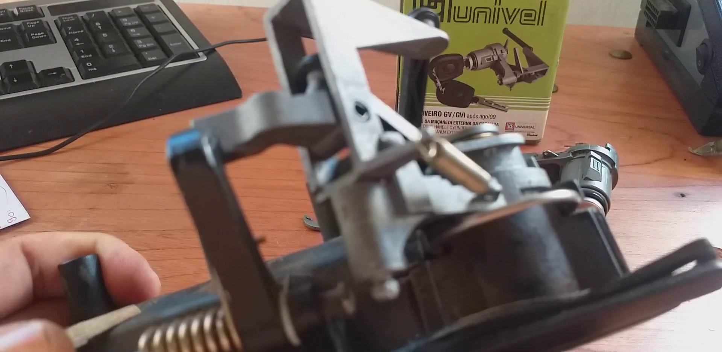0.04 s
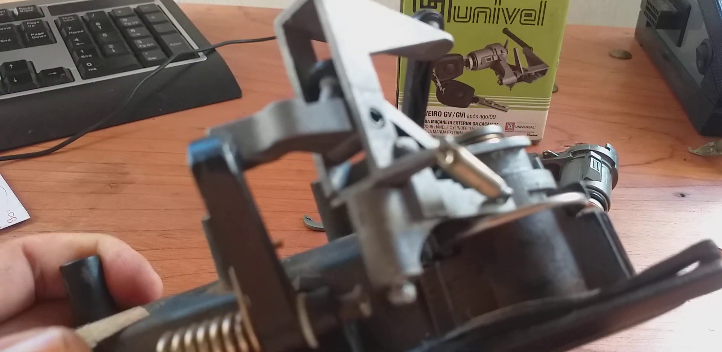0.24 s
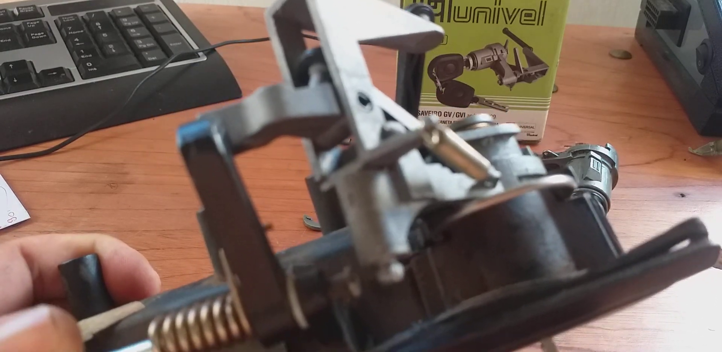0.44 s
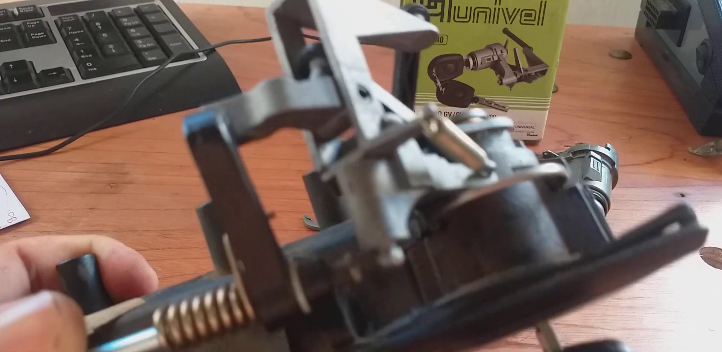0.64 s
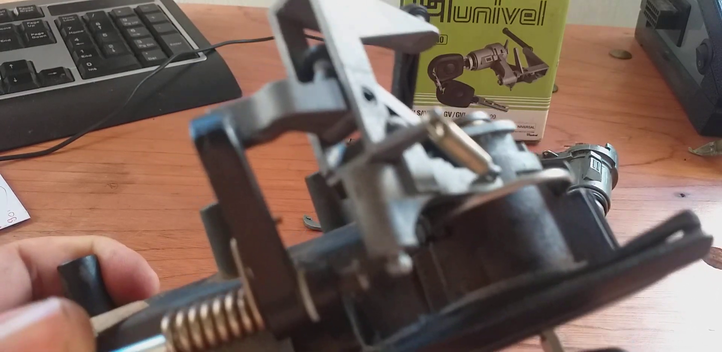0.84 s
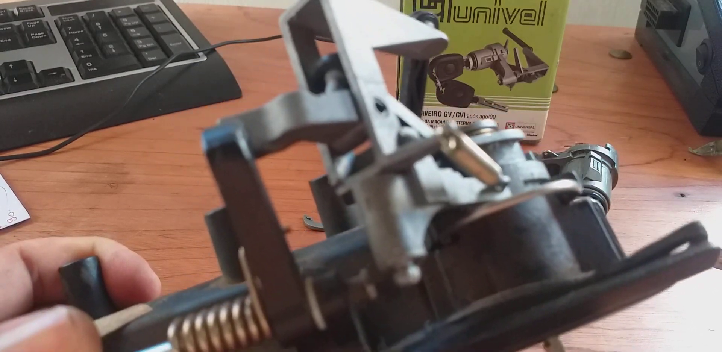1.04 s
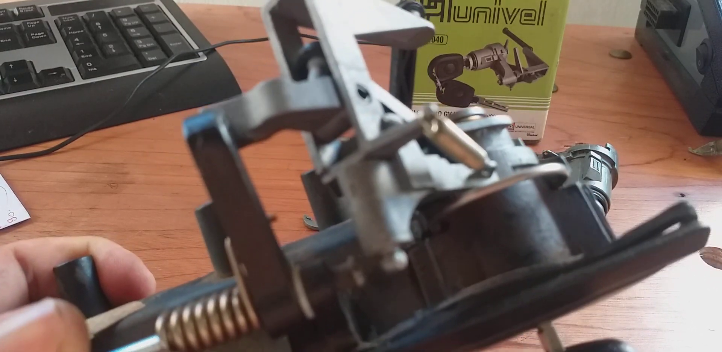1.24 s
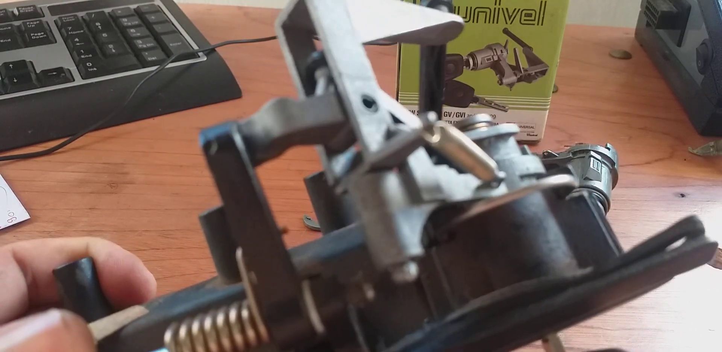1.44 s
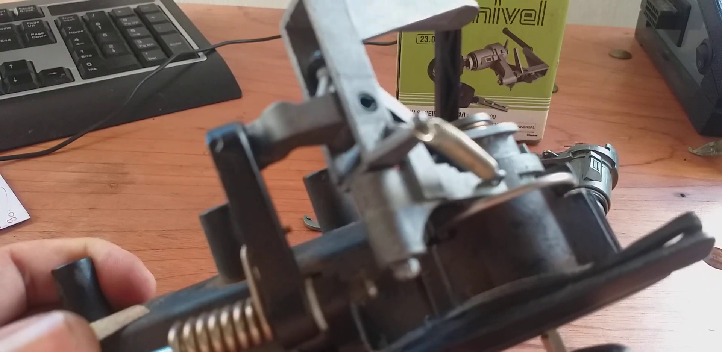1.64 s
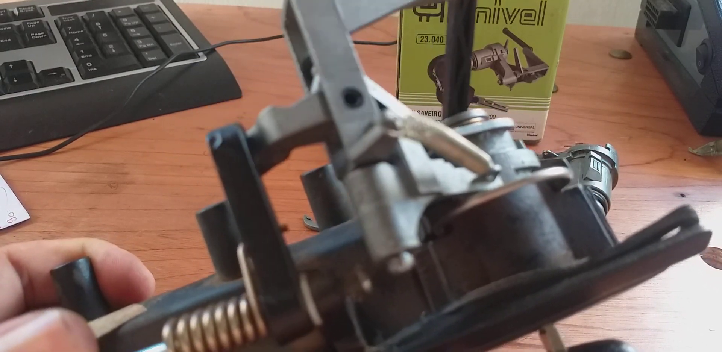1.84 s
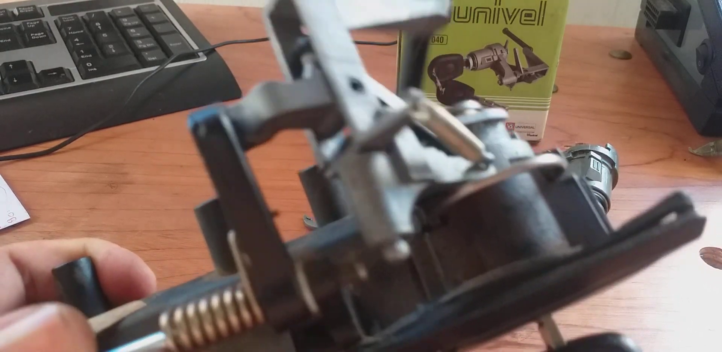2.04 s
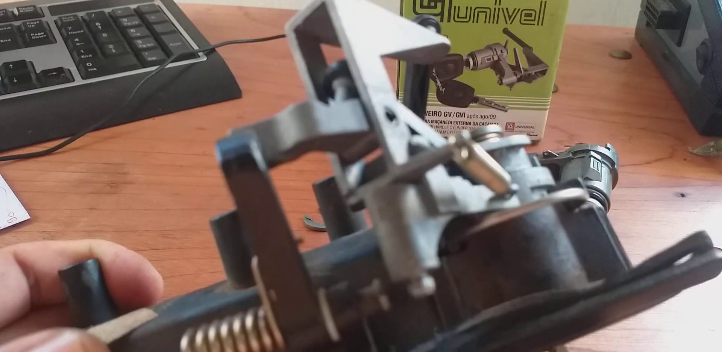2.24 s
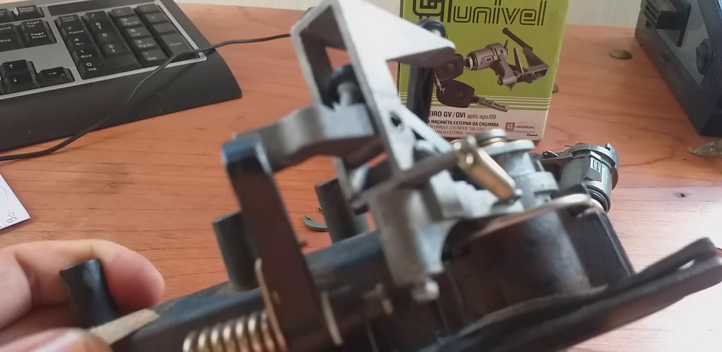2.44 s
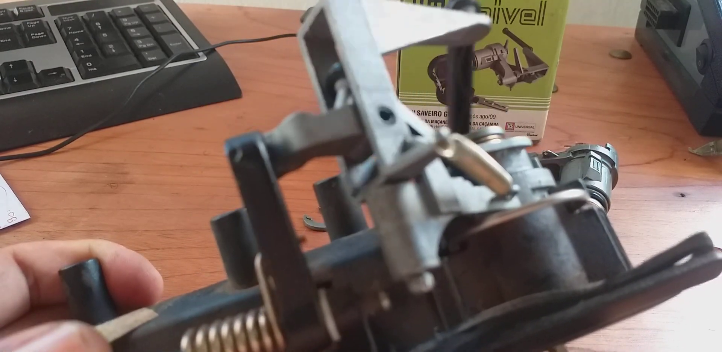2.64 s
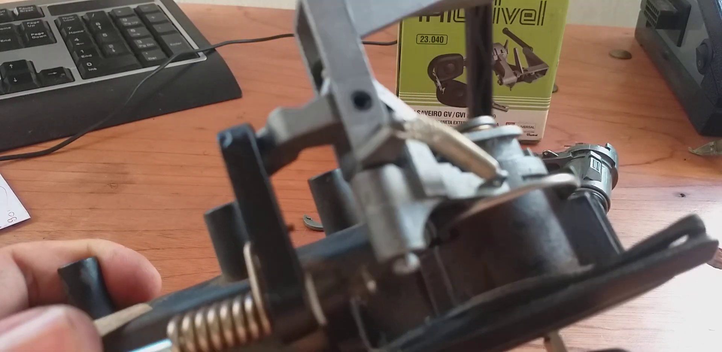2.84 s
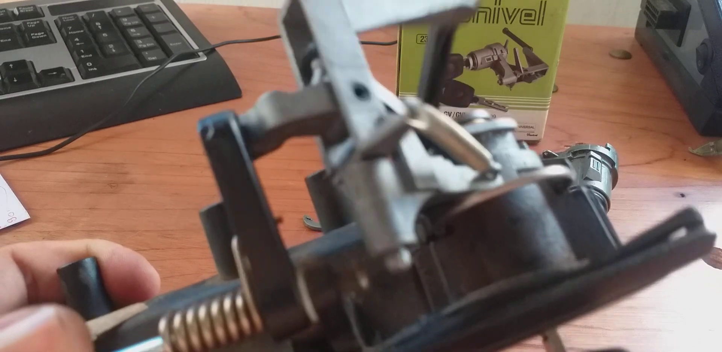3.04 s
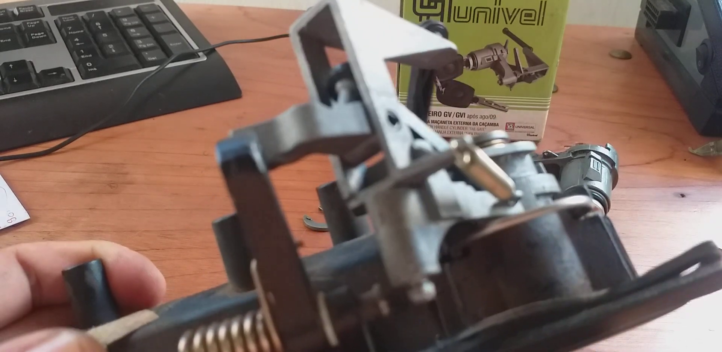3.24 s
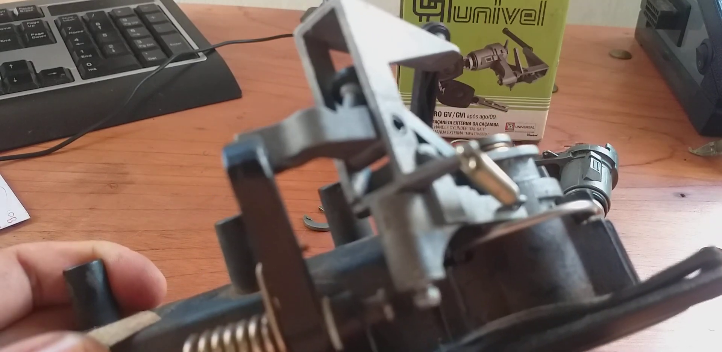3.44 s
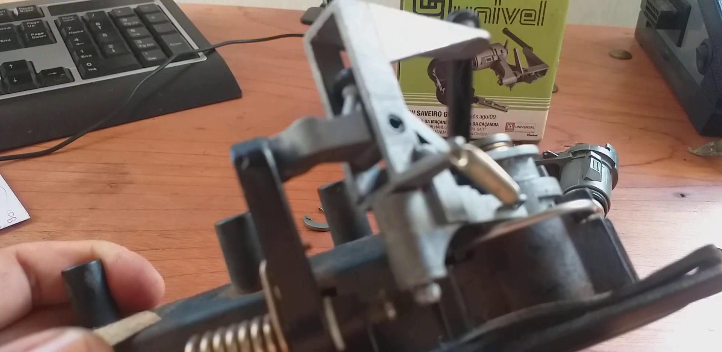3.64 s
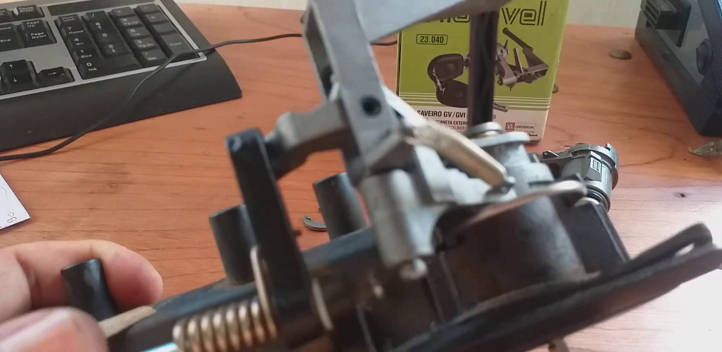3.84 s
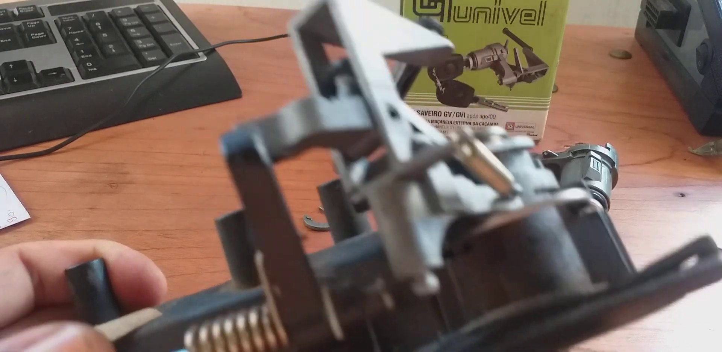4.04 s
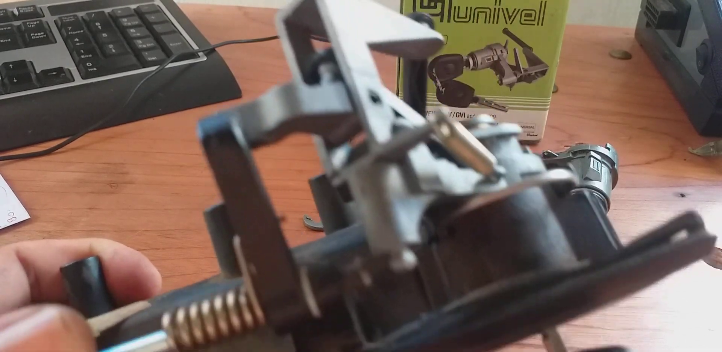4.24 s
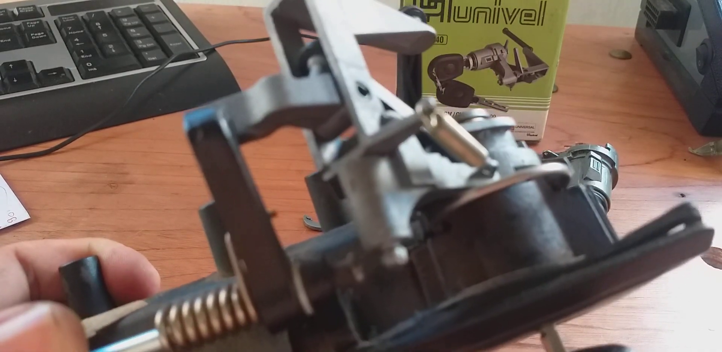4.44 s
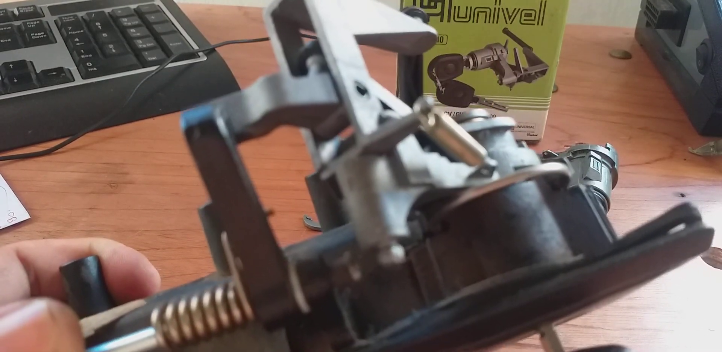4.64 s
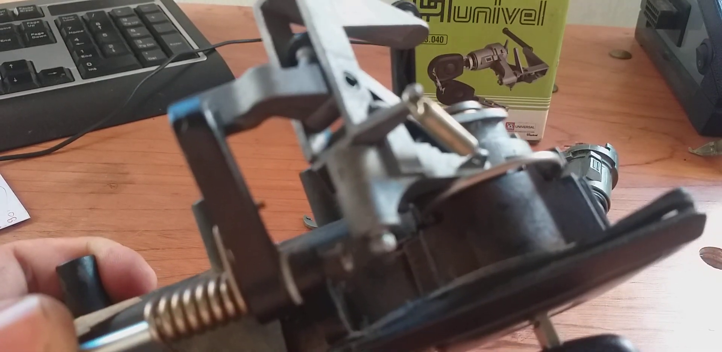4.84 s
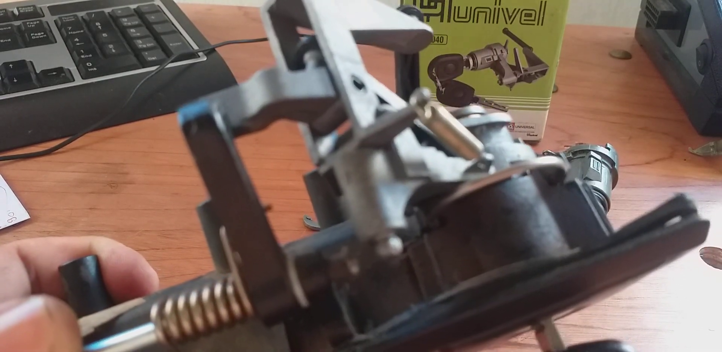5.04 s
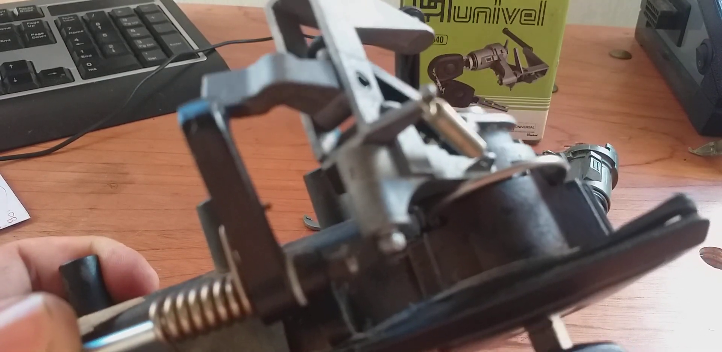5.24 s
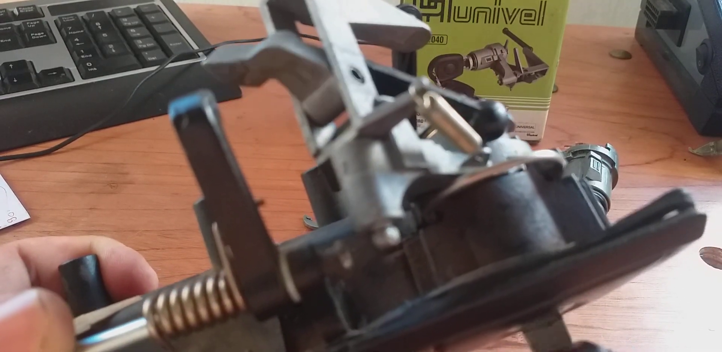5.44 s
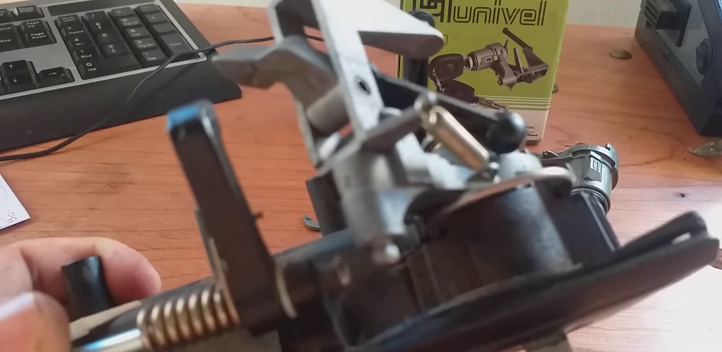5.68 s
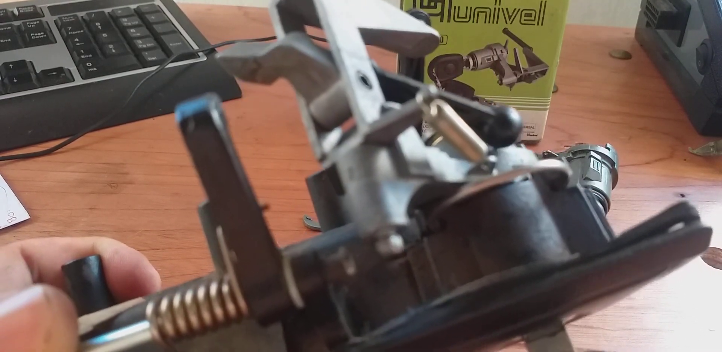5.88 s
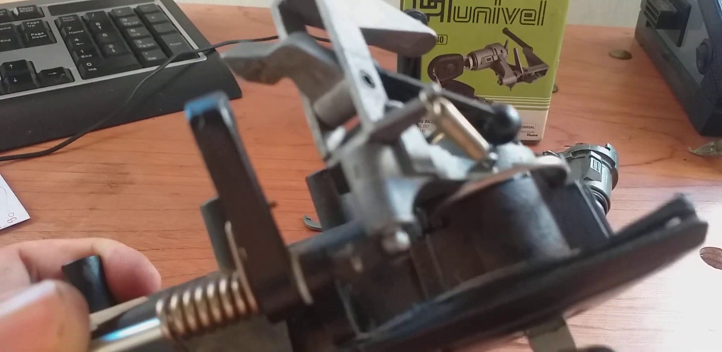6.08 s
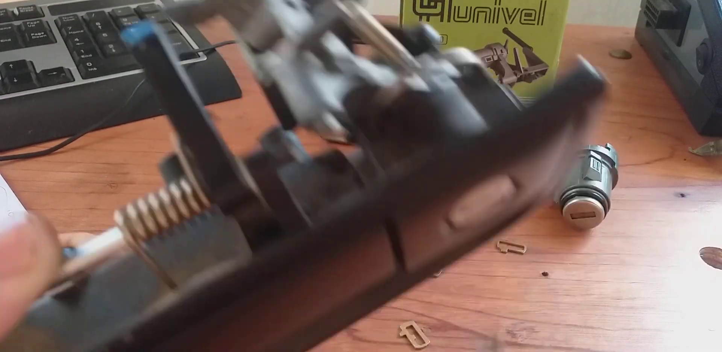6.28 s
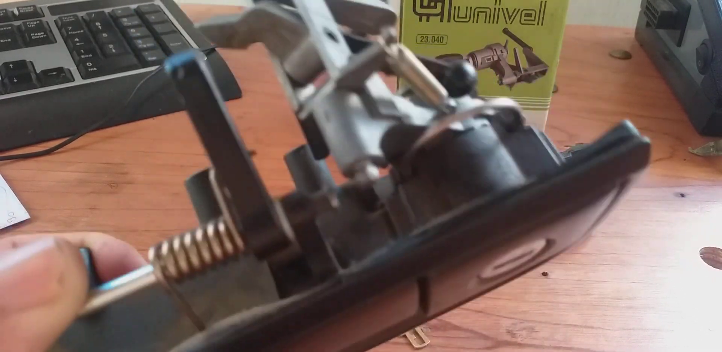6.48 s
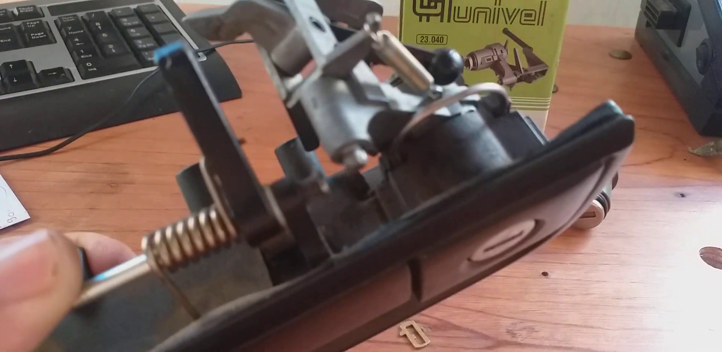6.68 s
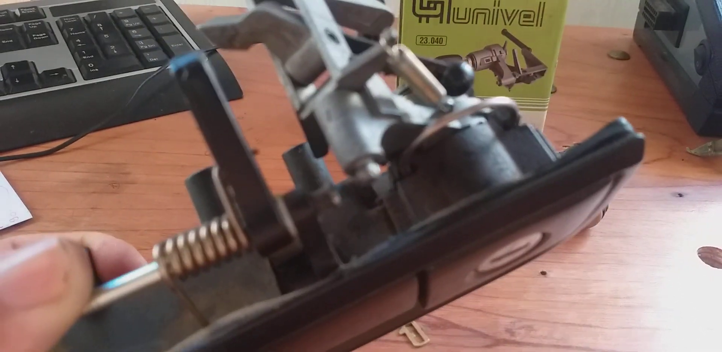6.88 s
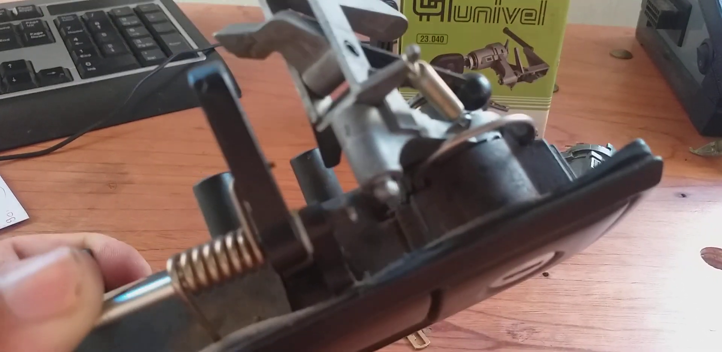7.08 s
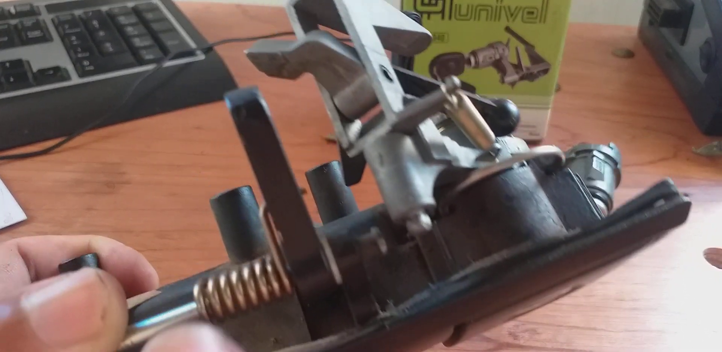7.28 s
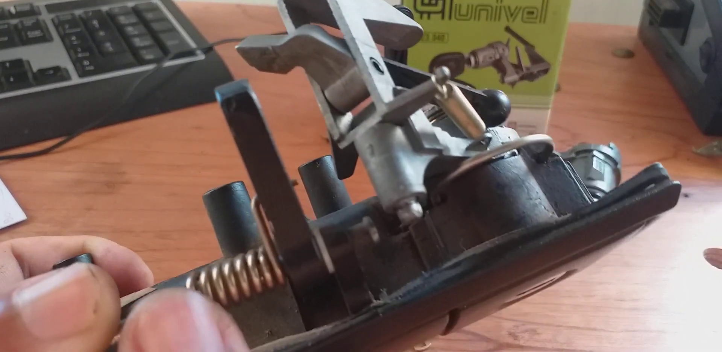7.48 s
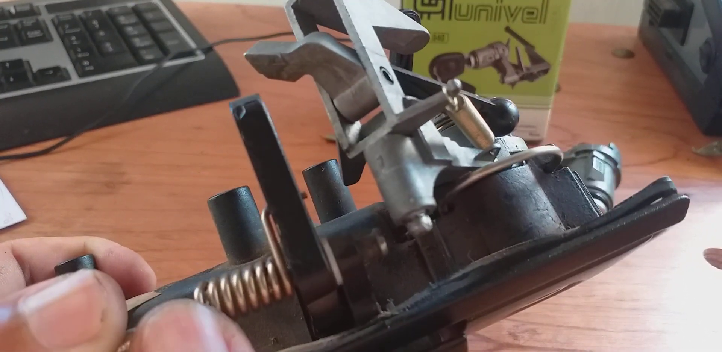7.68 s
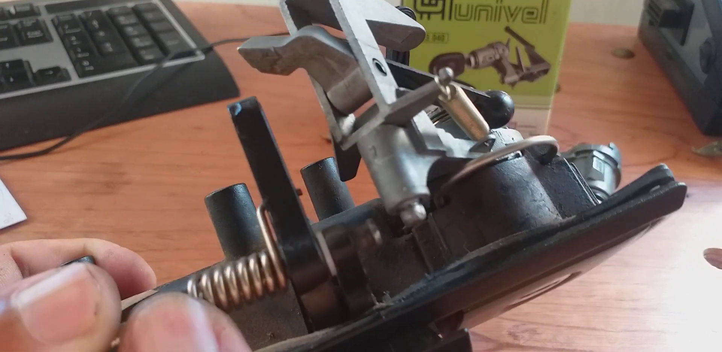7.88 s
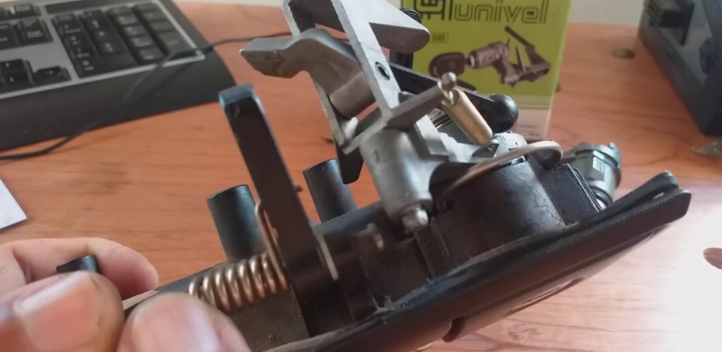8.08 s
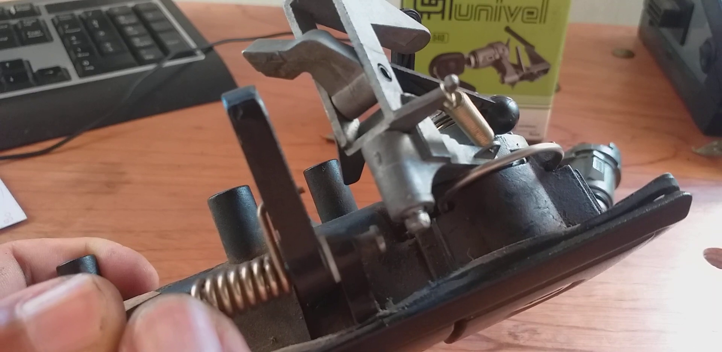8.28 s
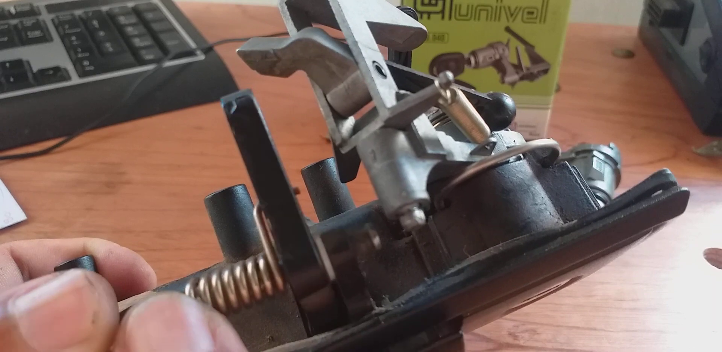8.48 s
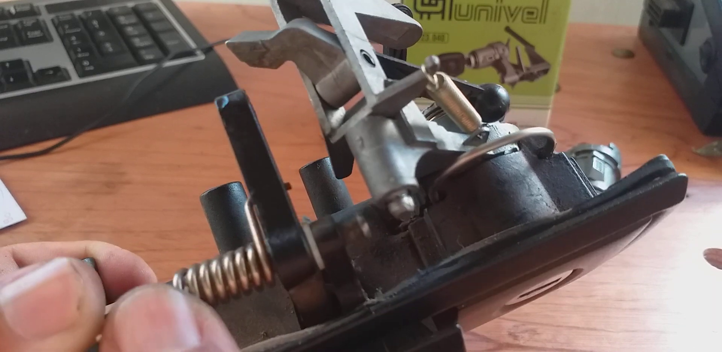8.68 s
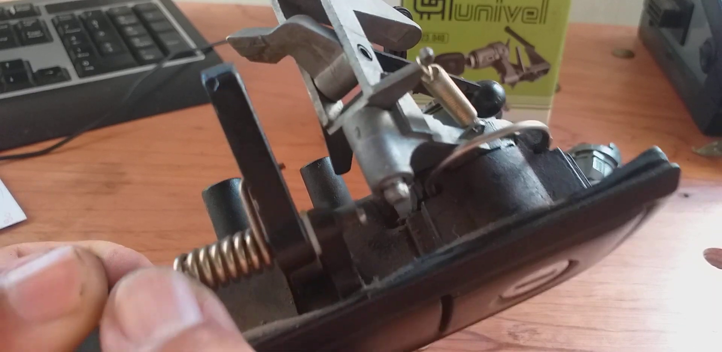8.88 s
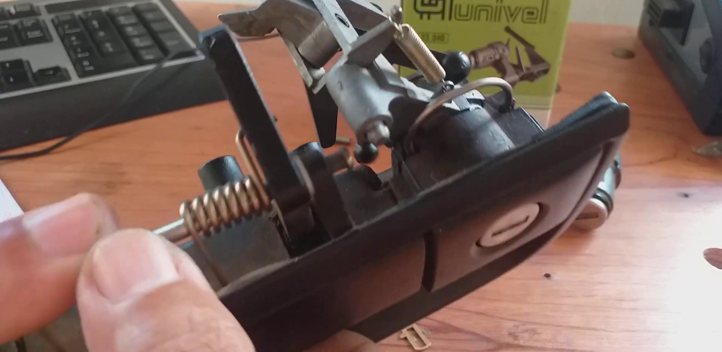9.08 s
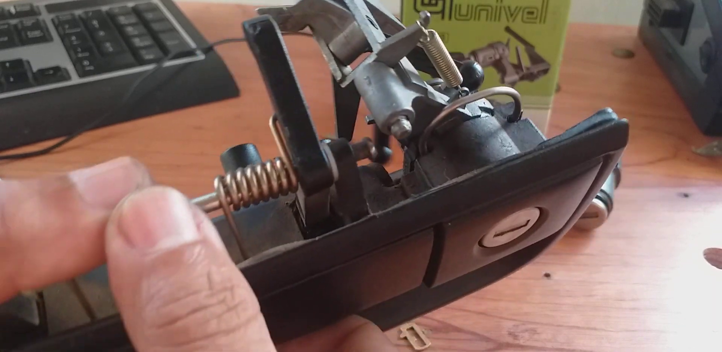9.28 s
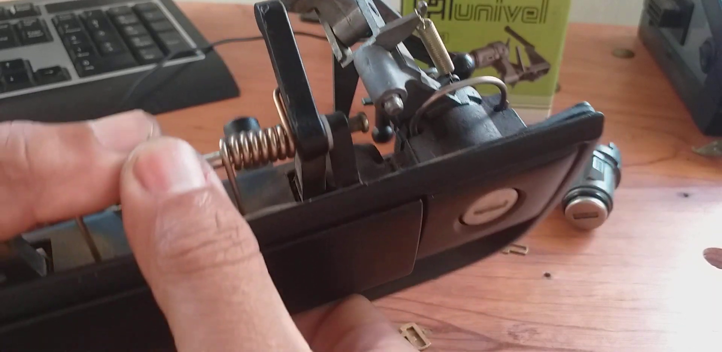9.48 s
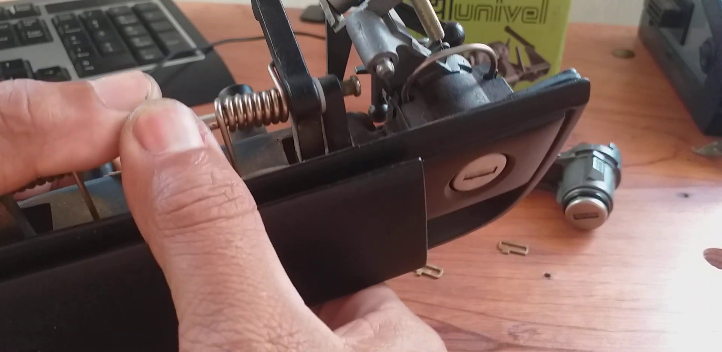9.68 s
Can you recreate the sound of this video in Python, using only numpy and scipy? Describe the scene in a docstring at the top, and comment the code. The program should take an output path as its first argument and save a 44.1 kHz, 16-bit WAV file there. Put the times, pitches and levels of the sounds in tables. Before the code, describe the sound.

A metal lock handle is worked by hand, close to the microphone in a small workshop. Its steel levers click and scrape lightly at uneven intervals, with soft, dull knocks from the housing. About six seconds in, a dry pivot gives a brief, loud, very high squeak with a sharp click. The sprung handle snaps back and rattles, then only a few faint ticks follow. A distant engine drones faintly and fades.

```python
"""Tailgate handle on a workshop desk

A tailgate lock handle is worked by hand, close up. Its steel levers click and rub, its housing knocks,
a dry pivot sticks and slips in a very high squeak, then the sprung handle snaps back and rattles.
A far engine drones and fades. The loudest squeak ducks the limiter for about two seconds."""
import sys
import numpy as np
from scipy import signal
from scipy.fft import rfft, irfft, next_fast_len
from scipy.io import wavfile
from scipy.ndimage import uniform_filter1d, map_coordinates

SR = 44100
rng = np.random.default_rng(int(sys.argv[2]) if len(sys.argv) > 2 else 0)


def inscribe(sig):
    """Save sig as 16-bit PCM at rate SR to the path in sys.argv[1].

    A 1-D sig is mono; a 2-D sig holds one channel per row.
    Samples are clipped to [-1, 1] before scaling.
    """
    pcm = np.round(np.clip(np.atleast_2d(sig).T, -1, 1) * 32767)
    wavfile.write(sys.argv[1], SR, pcm.astype(np.int16))


N = 428652

# decay of the small workshop: f/Hz, t60/s
ROOM_DECAY = [(150, .4), (500, .38), (1500, .34), (4000, .315), (8000, .29), (13000, .28)]
# tone of its reverb: f/Hz, level/dB
ROOM_EQ = [(150, -4), (600, -3), (2500, -3.5), (5000, -5.5), (8000, -6.3), (13000, -6)]
# spectrum of the room tone: f/Hz, relative level/dB
HISS_SPECTRUM = [(25, 0), (40, 10), (62, 26), (110, 26), (200, 13), (350, 9), (600, 8), (1000, 4),
                 (2000, 1), (5000, -1), (9500, -4), (13000, -.5), (16000, 0)]
# spectrum of the engine's rumble: f/Hz, relative level/dB
RUMBLE_SPECTRUM = [(25, -42), (60, -18), (115, -3), (170, -3), (220, -6), (320, -6), (400, -12), (500, -22),
                   (900, -37), (2000, -70)]
# the engine's cycle rate: t/s, f/Hz
ENGINE_SPEED = [(0, 29), (1.2, 28.6), (2.5, 28.6), (3.3, 27.5), (5, 26.8), (7, 27), (9.7, 27.3)]
# the engine's fader curve: t/s, relative level/dB
ENGINE_LEVEL = [(0.0, -67), (0.46, -55), (1.65, -61), (1.86, -57), (3.32, -66), (4.32, -65), (4.48, -70),
                (6.72, -67), (7.51, -80), (7.78, -79), (7.97, -72), (8.54, -77), (8.75, -73), (9.7, -80)]
# the engine's harmonics: multiple of the cycle rate, relative level/dB
ENGINE_ORDERS = [(1, -41), (2, -20), (3, -16), (4, -9), (5, 0), (6, 0), (7, -13), (8, -16), (9, -12),
                 (10, -11), (11, -12), (12, -14), (13, -17), (14, -19)]
# modes of housing and desk: f/Hz, relative level/dB, t60/s
HOUSING_MODES = [(85, -12, .14), (125, -6, .16), (165, -6, .18), (200, -5, .18), (300, -14, .24)]
# jolts of the housing against hand and desk: t/s, relative level/dB, boom f/Hz
JOLTS = [(.582, -39, 172), (1.298, -44, 180), (2.588, -37, 177), (3.115, -41, 134), (3.606, -38, 165),
         (4.036, -40, 134), (4.075, -47, 70), (5.112, -48, 131), (5.211, -46, 150), (5.859, -47, 140),
         (6.041, -47, 130), (6.281, -38, 150), (6.436, -34, 118), (6.824, -31, 160), (6.843, -38, 125),
         (8.086, -32, 196), (8.092, -38, 62), (9.268, -53, 60)]
# metal sliding on metal: middle t/s, length/s, level/dB, centre f/Hz
RUBS = [(.507, .014, -56, 5300), (.565, .09, -64, 12000), (.58, .14, -65, 3800), (.88, .2, -74, 6200),
        (1.47, .16, -71, 750), (4.3, .16, -75, 6500), (4.69, .1, -74, 5600), (4.82, .18, -77, 3400),
        (5.39, .05, -73, 6500), (6.222, .055, -44, 6000), (6.2, .04, -42, 12000), (6.274, .026, -27, 12400),
        (7.09, .022, -47, 11200), (7.32, .12, -78, 1800)]
# stick-slip squeaks: peak t/s, f/Hz, peak level/dB, 60 dB rise/s, 60 dB fall/s
PIVOT_SQUEAKS = [(.2183, 15400, -35, .002, .022), (2.085, 7750, -68, .15, .1), (3.100, 7700, -67, .05, .08),
                 (4.027, 7600, -63, .05, .06), (6.150, 11830, -29, .003, .025),
                 (6.151, 13600, -40, .003, .04), (6.222, 11850, -34, .08, .04),
                 (6.2412, 13130, 6, .011, .008), (6.2485, 13620, 3, .028, .028),
                 (6.2738, 12170, 6, .008, .036), (7.083, 11250, -40, .015, .03),
                 (7.095, 11450, -38, .03, .02)]
# modes of the levers and their frame: f/Hz, width/Hz, boost/dB
STEEL_MODES = [(340, 50, 6), (470, 70, 6), (620, 110, 4), (840, 70, 8), (1020, 120, 12), (1330, 200, 6),
               (2000, 300, 3), (2580, 300, 4.5), (3050, 160, 2), (3600, 180, 3), (3950, 140, 3),
               (5020, 320, 4), (5650, 200, 1), (6270, 180, 2), (6760, 200, 2), (7630, 320, 1),
               (11850, 300, 5)]
# body, clack, ring and tick of a click: middle f/Hz, relative level/dB
CLICK_REGISTERS = [(800, -.5), (2500, 2.5), (6000, 3.6), (11500, -5.5)]
# lever contacts, the hard ones bright and short: t/s, struck part f/Hz, strength/dB, hardness/(dB/octave)
LEVER_CONTACTS = [(0.2176, 15310, -63, 3.8), (0.2712, 930, -62, 1.8), (0.2835, 3200, -70, -1.9),
                  (0.5082, 5320, -68, 0.0), (0.512, 5250, -60, 3.2), (0.5398, 4630, -69, 0.8),
                  (0.5823, 4220, -71, -4.0), (0.6484, 2350, -60, 0.8), (1.287, 1810, -66, -1.2),
                  (1.3006, 1060, -60, 1.8), (1.3393, 7600, -69, -2.0), (1.7591, 1400, -79, -4.0),
                  (1.8673, 900, -77, -1.9), (2.1051, 7670, -64, -1.4), (2.1595, 5000, -71, -0.7),
                  (2.1674, 4970, -75, 0.8), (2.495, 3680, -69, -3.0), (2.5614, 1010, -74, 0.7),
                  (2.5889, 930, -66, 3.3), (2.8376, 3040, -76, -2.5), (3.1157, 7620, -55, -2.0),
                  (3.5404, 2930, -70, -0.5), (3.5675, 1010, -70, 0.8), (3.6076, 7580, -66, -2.6),
                  (3.8292, 3040, -63, -0.1), (4.0366, 7600, -52, -2.1), (4.0545, 4930, -67, 0.7),
                  (4.066, 5020, -65, 1.8), (4.2063, 4930, -75, 4.5), (4.429, 6000, -84, 0.2),
                  (4.772, 12000, -85, -0.6), (5.2144, 3570, -70, -2.5), (5.2395, 3570, -79, -5.1),
                  (5.4129, 6140, -74, 1.9), (5.5083, 7390, -72, 0.6), (5.5156, 7640, -59, 1.2),
                  (5.5524, 990, -72, -0.3), (5.8026, 3120, -73, 0.0), (5.856, 4330, -69, -2.2),
                  (5.9045, 4520, -74, 1.9), (6.0446, 4890, -81, -5.2), (6.1488, 11780, -58, 6.6),
                  (6.1941, 11800, -58, 4.0), (6.2212, 11760, -55, 4.6), (6.2306, 12000, -54, 8.1),
                  (6.2684, 5300, -46, 3.4), (6.281, 5400, -33, 5.1), (6.5781, 4780, -52, 0.6),
                  (6.6058, 4800, -51, -0.8), (6.6171, 3620, -48, -2.4), (6.6631, 4000, -42, -1.9),
                  (6.6745, 3100, -52, -1.3), (6.739, 4440, -57, -0.5), (6.8178, 1420, -37, 0.6),
                  (6.8252, 3000, -33, 0.0), (6.8366, 7600, -38, 0.0), (6.8425, 1260, -39, -1.0),
                  (6.8521, 4000, -37, -0.4), (6.887, 4890, -48, -2.5), (7.0795, 11000, -58, -1.8),
                  (7.0915, 11480, -57, -2.3), (7.5263, 2390, -84, 1.6), (7.8301, 6090, -75, -1.3),
                  (8.0869, 1100, -76, -5.5), (9.4744, 5640, -89, 1.0)]


def amp(db):
    """Decibels to gain."""
    return 10 ** (np.asarray(db) / 20)


def unit(x):
    """Scale to rms 1."""
    return x / np.sqrt(np.mean(x ** 2) + 1e-20)


def along(points, hz):
    """Read (f/Hz, value) points on a log frequency axis."""
    f, v = np.transpose(points)
    return np.interp(np.log(hz + 1), np.log(f + 1), v)


def automation(points):
    """Join (t/s, value) points into one value per sample."""
    return np.interp(np.arange(N) / SR, *np.transpose(points))


def wobble(rate, size=N):
    """A smooth random curve, rate knots a second."""
    knots = rng.standard_normal(int(size * rate / SR) + 4)
    return map_coordinates(knots, [np.arange(size) * rate / SR])


def filtered(x, response):
    """EQ x with a gain given as a function of frequency."""
    size = next_fast_len(len(x) + SR // 8)
    return irfft(rfft(x, size) * response(np.fft.rfftfreq(size, 1 / SR)), size)[:len(x)]


def noise(spectrum):
    """Coloured noise of rms 1."""
    return unit(filtered(rng.standard_normal(N), lambda hz: amp(along(spectrum, hz))))


def causal(gain):
    """The minimum-phase response with this gain: nothing sounds before the blow."""
    cepstrum = irfft(np.log(np.maximum(gain, 1e-9)))
    half = len(cepstrum) // 2
    cepstrum[1:half] *= 2
    cepstrum[half + 1:] = 0
    return np.exp(rfft(cepstrum))


def add(track, s, sound):
    """Mix a sound into the track from time s on."""
    start = max(round(s * SR), 0)
    track[start:start + len(sound)] += sound[:max(N - start, 0)]


def reverb(sound, wet_db, predelay_s=.004, build_s=.004):
    """The workshop's reflections: a noise tail, new for each place of the moving handle."""
    hz, t, spectra = signal.stft(rng.standard_normal(SR // 2), SR, nperseg=256)
    t60 = np.maximum(along(ROOM_DECAY, hz), .05)[:, None]
    fade = amp(wet_db + along(ROOM_EQ, hz)[:, None] - 60 * t / t60)
    unit_energy = np.sqrt(2 * np.log(1000) / (t60 * SR))
    tail = signal.istft(spectra * fade * unit_energy, SR, nperseg=256)[1]
    age = np.maximum(np.arange(len(tail)) / SR - predelay_s, 0)
    return signal.fftconvolve(sound, tail * (1 - np.exp(-age / build_s)))


def in_room(sound, wet_db=0):
    """The direct sound plus its reverb."""
    wet = reverb(sound, wet_db)
    return wet + np.pad(sound, (0, len(wet) - len(sound)))


def room_tone(level_db=-71):
    """The steady air of the workshop."""
    return amp(level_db) * noise(HISS_SPECTRUM)


def far_engine(trim_db=2, rumble_db=-65.8, cruise_db=-62, flutter_db=2.5, drift=.005, firing_order=6):
    """An engine slows and fades behind the walls; its firing harmonic and rumble follow its level."""
    drone_db = automation(ENGINE_LEVEL)
    load_db = drone_db - cruise_db
    phase = 2 * np.pi * np.cumsum(automation(ENGINE_SPEED) * (1 + drift * wobble(5))) / SR
    gains = {order: amp(db + (order == firing_order) * .9 * load_db) for order, db in ENGINE_ORDERS}
    harmonics = sum(gain * amp(flutter_db * wobble(5)) * np.sin(order * phase + rng.uniform(0, 2 * np.pi))
                    for order, gain in gains.items())
    drone = unit(harmonics / np.sqrt(sum(gain ** 2 for gain in gains.values())))
    rumble = amp(rumble_db + .7 * load_db + 1.5 * wobble(12)) * noise(RUMBLE_SPECTRUM)
    return amp(drone_db + trim_db) * drone + rumble


def housing_thuds(trim_db=-5, attack_s=.003, grip_detune=.05, boom_t60=.17):
    """The housing knocks dully; the grip sets its main boom and shifts its other modes a little."""
    out, t = np.zeros(N), np.arange(SR // 2) / SR
    for s, db, boom_hz in JOLTS:
        modes = [(boom_hz, 0, boom_t60)]
        modes += [(hz * rng.normal(1, grip_detune), level + rng.normal(0, 2), t60)
                  for hz, level, t60 in HOUSING_MODES]
        ring = sum(amp(level - 60 * t / t60) * np.sin(2 * np.pi * (hz * t + rng.random()))
                   for hz, level, t60 in modes)
        add(out, s, amp(db + trim_db) * ring * (1 - np.exp(-t / attack_s)))
    return out


def lever_rubs(grit_db=6, octaves=.4):
    """Levers slide along each other with a gritty hiss."""
    out, t = np.zeros(N), np.arange(-SR // 4, SR // 4) / SR
    for s, length, db, centre_hz in RUBS:
        grit = rng.standard_normal(len(t)) * amp(grit_db * wobble(500, len(t)))
        rub = unit(filtered(grit, lambda hz: 1 / (1 + (np.log2((hz + 1) / centre_hz) / octaves) ** 2)))
        swell = amp(db) * np.exp(-(2 * t / length) ** 2)
        add(out, s + t[0], in_room(rub * swell))
    return out


def pivot_squeaks(waver=.006, wet_db=-5):
    """A dry pivot sings up on one stiff mode and dies as it slips free; it beams at the microphone."""
    out, t = np.zeros(N), np.arange(-SR // 8, SR // 8) / SR
    for s, hz, db, rise, fall in PIVOT_SQUEAKS:
        swell = amp(db - 60 * np.where(t < 0, -t / rise, t / fall))
        phase = 2 * np.pi * np.cumsum(hz * (1 + waver * wobble(500, len(t)))) / SR
        add(out, s + t[0], in_room(swell * np.sin(phase), wet_db))
    return out


def register_levels(pitch, strength_db, hardness, tilt_hz=4100, part_db=13, part_octaves=1.5):
    """A harder contact is brighter, and each is boosted round the pitch of the part that it strikes."""
    hz, db = np.transpose(CLICK_REGISTERS)
    tilt = hardness * np.log2(hz / tilt_hz)
    boost = part_db / (1 + (np.log2(hz / pitch) / part_octaves) ** 2)
    return strength_db + db + tilt + boost


def chatter(t, hardness, shake_db=-14, shake_t60=.055, rebound_db=-21, rough_db=3.2):
    """The force of a contact: a rough crack, a softer shake, and one rebound of the loose lever."""
    rise_s = .0004 * 2 ** (-hardness / 3.5)
    crack_t60 = .018 * 2 ** (-hardness / 12)
    decay = amp(-60 * t / crack_t60) + amp(shake_db - 60 * t / shake_t60)
    hit = decay * (1 - np.exp(-t / rise_s))
    rebound = amp(rebound_db) * np.interp(t - rng.uniform(.008, .03), t, hit)
    return rng.standard_normal(len(t)) * (hit + rebound) * amp(rough_db * wobble(1200, len(t)))


def steel_response(hz, pitch, heavy, vary_db=3):
    """The levers' modes at new strengths; the struck part stands out, and light taps sound hollow."""
    def mode(centre, width, db):
        return amp(db) ** 2 / (1 + (2 * (hz - centre) / width) ** 2)

    frame = 1 + sum(mode(f, width, db + rng.normal(0, vary_db)) for f, width, db in STEEL_MODES)
    struck_part = 1 + mode(pitch, width=.14 * pitch, db=7)
    hollow = 1 + (1 - heavy) * mode(1600, width=400, db=7)
    return np.sqrt(frame * struck_part / hollow)


def steel_ring(force, steel, hz, levels, blow_s=.009, bass_db=-12):
    """A force spectrum rings the steel; an EQ brings each register to its level over blow_s."""
    edges_hz = [400, 1500, 4200, 8500, 16000]
    corners_hz = [50, 200, 1200, 1800, 3700, 4900, 7400, 9200, 16000]  # bass, then two per register
    size = 2 * (len(hz) - 1)
    power = 2 * np.abs(force * steel) ** 2 / (size * blow_s * SR)
    band_power = [power[(hz >= lo) & (hz < hi)].sum() for lo, hi in zip(edges_hz, edges_hz[1:])]
    eq_db = np.repeat(levels - 10 * np.log10(band_power), 2)
    eq = amp(np.interp(np.log(hz + 1), np.log(corners_hz), np.r_[eq_db[0] + bass_db, eq_db]))
    return irfft(force * causal(steel * eq))


def lever_clicks(trim_db=.3, heavy_db=-45, ripple_db=2, size=4096):
    """Steel meets steel: each contact chatters briefly and rings the levers and the room."""
    out, t, hz = np.zeros(N), np.arange(size) / SR, np.fft.rfftfreq(size, 1 / SR)
    for s, pitch, strength_db, hardness in LEVER_CONTACTS:
        levels = register_levels(pitch, strength_db, hardness)
        body_db, tick_db = levels[0], levels[3]
        heavy = np.clip((body_db - heavy_db) / 10 + .5, 0, 1)
        bright = np.clip((tick_db - body_db) / 30, 0, 1)
        force = rfft(chatter(t, hardness))
        steel = steel_response(hz, pitch, heavy)
        add(out, s, steel_ring(force, steel, hz, levels))
        # the room gathers sound from all directions, which evens out part of the chatter's ripple
        diffuse_force = np.sqrt(1 + (unit(np.abs(force)) * amp(ripple_db)) ** 2)
        # heavy blows shake the whole housing and feed the room more; bright snaps beam at the microphone
        wet_db = -1.6 + 2.8 * heavy - 7.5 * bright
        add(out, s, reverb(steel_ring(diffuse_force, steel, hz, levels), wet_db))
    return amp(trim_db) * out


def scene():
    """The handle up front over a bed of engine and room tone, in mono."""
    handle = lever_clicks() + pivot_squeaks() + lever_rubs() + housing_thuds()
    return (handle + far_engine() + room_tone())[None]


def record(dry, ceiling=.98, release_db_per_s=3, low_cut_hz=48, high_cut_hz=15900):
    """A low cut, a limiter that ducks at once and recovers slowly, then a steep high cut."""
    x = signal.sosfilt(signal.butter(3, low_cut_hz, "highpass", fs=SR, output="sos"), dry[0])
    excess_db = 20 * np.log10(np.maximum(np.abs(x) / ceiling, 1))
    recovery_db = release_db_per_s * np.arange(N) / SR
    duck_db = uniform_filter1d(np.maximum.accumulate(excess_db + recovery_db) - recovery_db, size=32)
    return filtered(x * amp(-duck_db), lambda hz: 1 / (1 + (hz / high_cut_hz) ** 160))[None]


dry = scene()
out = record(dry)
inscribe(out)
```